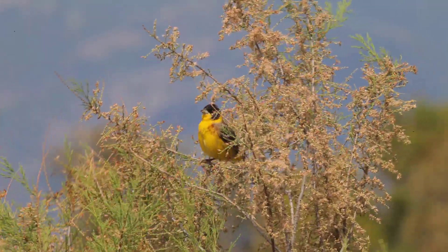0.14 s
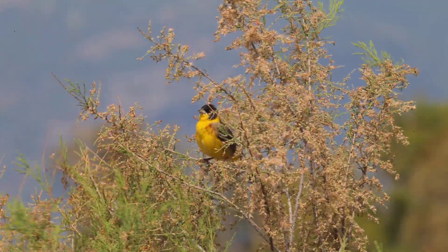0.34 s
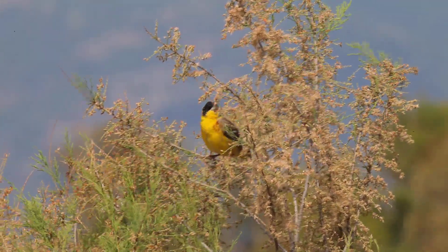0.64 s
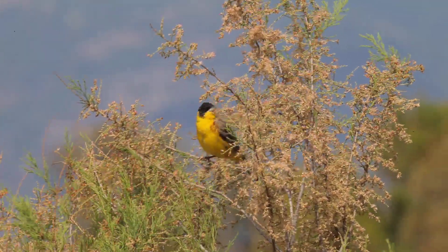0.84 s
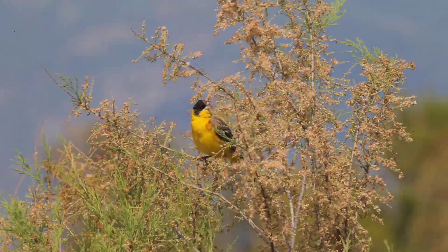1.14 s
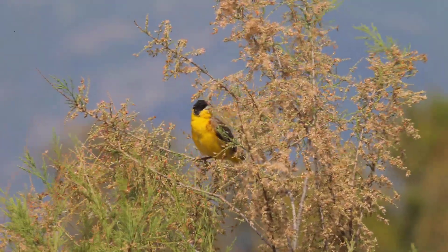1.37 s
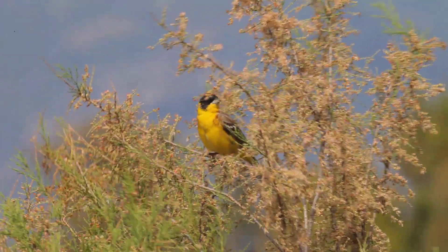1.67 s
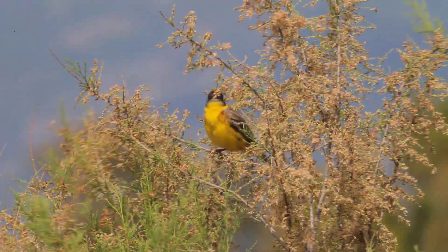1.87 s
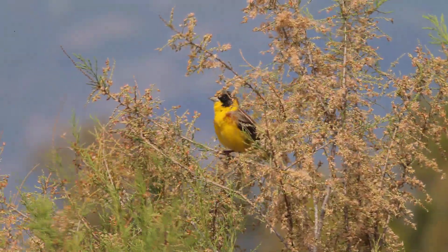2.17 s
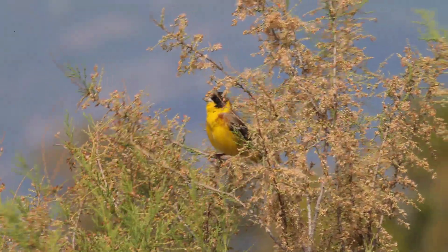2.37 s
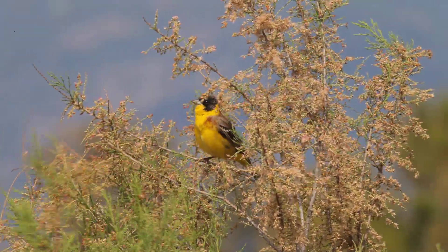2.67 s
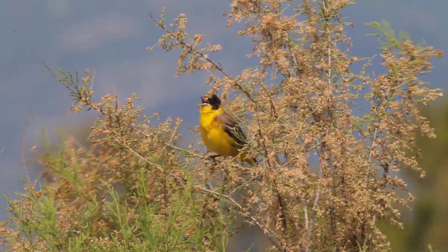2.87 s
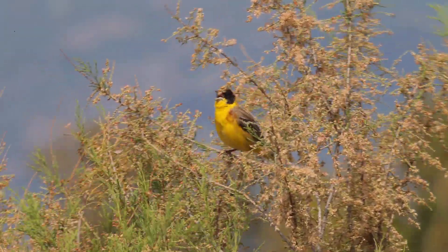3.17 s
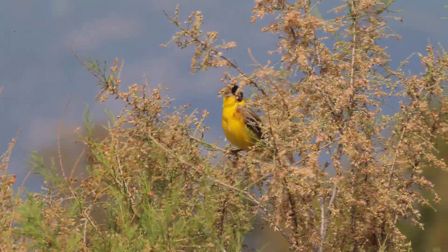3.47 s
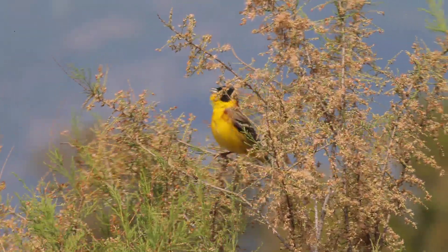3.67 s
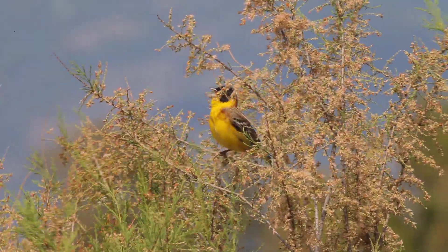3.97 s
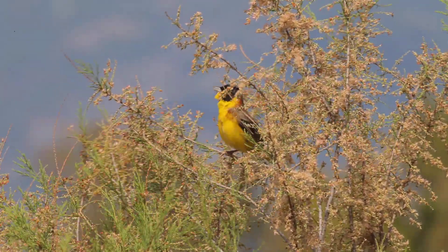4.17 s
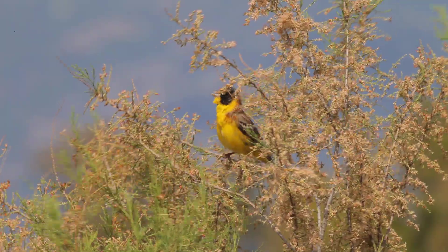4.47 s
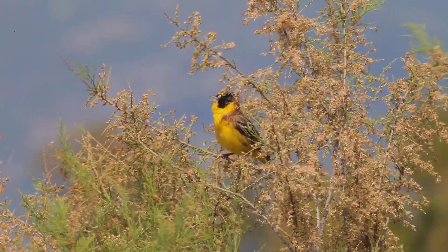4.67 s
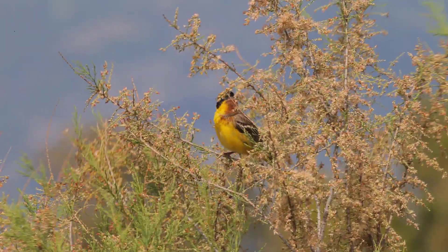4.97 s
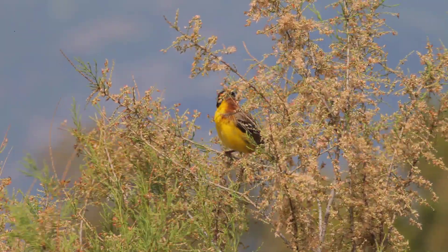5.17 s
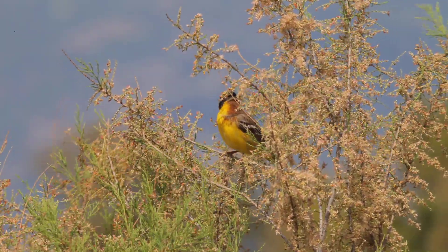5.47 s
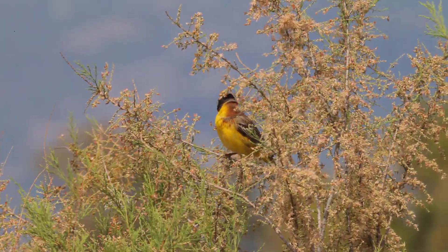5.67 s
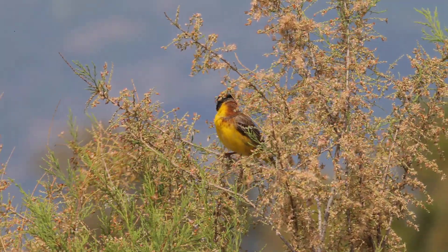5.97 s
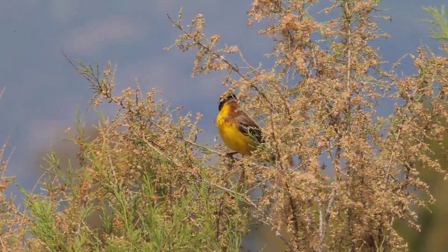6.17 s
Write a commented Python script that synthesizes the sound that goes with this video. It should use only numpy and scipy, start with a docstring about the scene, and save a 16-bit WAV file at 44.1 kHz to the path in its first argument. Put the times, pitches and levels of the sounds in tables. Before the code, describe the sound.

A small songbird gives three buzzy chips, two swelling buzzes and a quick run of high trills, over a light breeze and faint distant birds.

```python
"""In open country a bunting sings from a bush: three buzzy chips, two buzzes that end in a whistle,
then a quick run of trills. Membranes in its syrinx vibrate in the airflow, and the throat filters
the tone; ground and bushes reflect it. Other birds call far off, and foliage hisses in the breeze
over a low rumble. Close by are a dry rasp and the clicks, bumps and rustles of a handheld camera."""
import sys
import numpy as np
from scipy import signal
from scipy.fft import rfft, irfft
from scipy.io import wavfile
from scipy.ndimage import map_coordinates

SR = 44100
rng = np.random.default_rng(int(sys.argv[2]) if len(sys.argv) > 2 else 0)


def wrap_up_sound(samples):
    """Save the sound to the file named by the first command line argument, as 16-bit audio."""
    columns = np.atleast_2d(samples).T
    # keep every value between -1 and 1, then stretch to whole-number steps
    tamed = np.clip(columns, -1, 1)
    steps = np.round(tamed * 32767).astype(np.int16)
    wavfile.write(sys.argv[1], SR, steps)


N = 279153
TIME = np.arange(N) / SR


def bunting():
    """Superposition: the notes of one bird add up to its song."""
    out = arch()
    for table, voice in ((CHIPS, chip), (BUZZES, buzz), (FIGURES, figure),
                         (HELD_NOTES, held), (SLURS, slurred)):
        for s, *note in table:
            add(out, s, voice(*note))
    for s, *pulse, start_db, middle_db, end_db, hiss_db in TRILLS:
        add(out, s, trill(*pulse, (start_db, middle_db, end_db), hiss_db))
    return out


def syrinx(hz, db, second_db=-39, third_db=-38, jitter=0.0021, shimmer_db=1.7, edge_s=0.00076):
    """Self-sustained oscillation: a slightly unsteady tone with second and third harmonics."""
    t = np.arange(len(hz)) / SR
    hz = hz * (1 + jitter * wander(t, 898))
    phase = 2 * np.pi * np.cumsum(hz) / SR
    tone = np.sin(phase) + undb(second_db) * np.sin(2 * phase) + undb(third_db) * np.sin(3 * phase)
    ends = np.clip(np.minimum(t, t[-1] - t) / edge_s, 0, 1)
    return tone * ends * undb(db + shimmer_db * wander(t, 399))


def overtone_db(hz):
    """Membrane tension: high notes carry stronger harmonics than low ones."""
    return np.interp(hz, [2950, 3400, 4400], [-46, -37, -32])


CHIP_LOW_HZ, CHIP_HIGH_HZ, CHIP_SETTLE_S = 2890, 4170, 0.014
VIBRATO_HZ, SWING_HZ, WIDEST_S, PURE_S = 201.5, 1004, 0.015, 0.078
STROKES_PER_S, STROKE_SPAN_HZ = 96, 846
# Buzzy chips. Each row: start in seconds, length in seconds, level of the high voice in dB.
CHIPS = [(.559, 0.092, -24), (1.928, 0.096, -24.5), (2.513, 0.095, -22)]
def chip(length, db, harsh_s=0.025, harsh_delay_s=.006):
    """Frequency modulation on both sides of the syrinx: a dying vibrato above brief, harsh upstrokes."""
    t = clock(length)
    depth = np.interp(t, [CHIP_SETTLE_S / 2, WIDEST_S, PURE_S], [0, 1, 0])
    vibrato = np.cos(2 * np.pi * VIBRATO_HZ * t + 0.52 * wander(t, 92))
    carrier_hz = np.interp(t, [0, CHIP_SETTLE_S], [CHIP_LOW_HZ, CHIP_HIGH_HZ])
    high_db = db - 2 * depth ** 2  # a wide vibrato costs loudness
    out = syrinx(carrier_hz + SWING_HZ * depth * vibrato, high_db, second_db=-33, jitter=0.018)
    out *= envelope(t, attack_s=0.041, release_s=0.02)
    t = clock(harsh_s)
    sawtooth = (t * STROKES_PER_S) % 1 - .5
    low_hz = CHIP_LOW_HZ + STROKE_SPAN_HZ * sawtooth
    low = syrinx(low_hz, db - 11, second_db=-4, third_db=-17, jitter=0.025)
    breath = hiss(len(t)) * undb(db - 19)
    add(out, harsh_delay_s, (low + breath) * envelope(t, attack_s=0.0045, release_s=0.00374))
    return out


# Swelling buzzes. Each row: start in seconds, pulses per second, reference level in dB.
BUZZES = [(2.8855, 83.4, -13.5), (3.151, 78, -15.5)]
def buzz(rate, db):
    """Pulsed, then sustained oscillation: seven arching pulses swell and break into a whistle."""
    pulses = trill(7, rate, hz=3780, sweep_hz=0, arch_hz=1254, open_share=.8,
                   levels_db=(db - 24.5, db - 5, db - 5), hiss_db=-19.5)
    whistle = held(length=0.038, hz=3500, scoop_hz=-600, db=-15, attack_share=0.21)
    return np.concatenate([pulses, whistle])


# Pulse trains. Each row: start in seconds, pulse count, pulses per second, pitch in Hz, sweep and arch
# of a pulse in Hz, open share of the cycle, start, middle and end levels in dB, relative hiss in dB.
TRILLS = [ (3.3751, 7, 74.5, 2903, -140, -20, 0.84, -25.5, -16.5, -23.5, -60),
          (3.585, 6, 70.5, 3330, -400, -130, 0.86, -27, -18, -17.5, -36.5),
          (4.0432, 10, 161, 4550, -1350, 3, 0.68, -26.5, -23, -15.5, -25),
          (4.338, 5, 270, 2714, 612, 5.5, .9, -38, -32, -28, -37.5),
          (4.3749, 6, 36.4, 2940, -1, -450, .42, -23, -20, -28, -38),
          (4.3856, 5, 36.2, 3044, -81.5, -65, 0.36, -19.5, -22, -19, -41),
          (4.6185, 6, 86, 5120, 0, 350, 0.81, -45, -26.5, -20, -30),
          (4.699, 4, 265, 3210, 700, 0, .95, -37, -31, -27, -35), ]
def trill(pulses, rate, hz, sweep_hz, arch_hz, open_share, levels_db, hiss_db,
          edge=0.348, leak_db=-23, stray_hz=42, throat_half_width_hz=730):
    """Source and filter: the syrinx opens once a cycle, sweeping through the throat's resonance."""
    t = clock(pulses / rate)
    cycle = (t * rate + .025 * wander(t, rate)) % 1
    place = np.minimum(2 * cycle / open_share - 1, 1)  # -1 to 1 across a pulse
    offset_hz = sweep_hz * place / 2 + arch_hz * np.cos(np.pi * place)
    opening = np.clip((1 - np.abs(place)) / edge, 0, 1) + undb(leak_db)
    throat_gain = 1 / (1 + (offset_hz / throat_half_width_hz) ** 2)  # tuned to the central pitch
    effort_db = bend(t, *levels_db) + .5 * wander(t, 162.2)
    hz = hz + stray_hz * wander(t, rate)
    jitter = 0.02 * np.std(offset_hz) / throat_half_width_hz  # wide sweeps are rougher
    tone = syrinx(hz + offset_hz, effort_db, overtone_db(hz), overtone_db(hz), jitter)
    return tone * opening * throat_gain + hiss(len(t)) * undb(effort_db + hiss_db)


# A figure sung twice. Each row: start in seconds, reference level in dB.
FIGURES = [(3.7345, -19), (3.8725, -18.5)]
def figure(db, tut_spacing_s=0.035, swoop_at_s=.0675, swoop_s=.012):
    """Periodic repetition: after two low tuts, a downward swoop recurs as a fast, fading trill."""
    out = np.zeros(N)
    for s in (0, tut_spacing_s):
        tut = held(0.029, hz=2252, scoop_hz=400, db=db - 10.5, attack_share=0.047, release_share=0.21)
        add(out, s, tut)
    swoop = slurred(swoop_s, start_hz=4200, middle_hz=3640, end_hz=3080, start_db=db - 4, end_db=db)
    add(out, swoop_at_s, swoop)
    run = trill(6, rate=162, hz=3570, sweep_hz=-1000, arch_hz=0, open_share=.9,
                levels_db=(db, db - .8, db - 7), hiss_db=-42)
    add(out, swoop_at_s + swoop_s, run)
    return out


# Held notes. Each row: start and length in seconds, pitch and its initial offset in Hz, level in dB.
HELD_NOTES = [(3.364, 0.035, 2900, 1, -41), (3.554, 0.0207, 4211, 0, -34), (3.568, 0.017, 4254, -100, -22),
              (4.107, 0.016, 4220, -550, -16.5), (4.233, 0.019, 1796, 403, -35),
              (4.292, 0.012, 1785, 357, -35)]
def held(length, hz, scoop_hz, db, attack_share=0.13, release_share=0.1, scoop_s=0.0029, sag_db=7):
    """Exponential relaxation: a note settles onto its pitch while its level sags."""
    t = clock(length)
    pitch_hz = hz + scoop_hz * np.exp(-t / scoop_s)
    tone = syrinx(pitch_hz, db - sag_db * t / length, overtone_db(hz), overtone_db(hz))
    return tone * envelope(t, attack_share * length, release_share * length)


# Slurred notes. Each row: start and length in seconds, start, middle and end pitches in Hz,
# start and end levels in dB.
SLURS = [ (3.578, 0.0059, 4240, 3850, 2500, -19.5, -13.5), (4.3555, .018, 2770, 3040, 3200, -16, -24),
         (4.524, 0.028, 2860, 2380, 2060, -18.5, -34), (4.714, 0.016, 3310, 3550, 4400, -24, -22.5),
         (4.7315, 0.018, 3790, 3140, 2800, -20, -28), (4.756, .025, 2466, 2990, 3580, -30, -21.5),
         (4.7825, 0.018, 3220, 2640, 2300, -15.5, -41.5), ]
def slurred(length, start_hz, middle_hz, end_hz, start_db, end_db):
    """Quadratic frequency sweep: a note bends through three pitches."""
    t = clock(length)
    hz = bend(t, start_hz, middle_hz, end_hz)
    db = start_db + (end_db - start_db) * t / length
    tone = syrinx(hz, db, overtone_db(hz), overtone_db(hz), jitter=0.013)
    return tone * envelope(t, attack_s=0.0028, release_s=0.0045)


# Course of one low whistle. Each row: time in seconds, pitch in Hz, rms level in dB.
ARCH = [(4.135, 2028, -50), (4.159, 2048, -37.5), (4.173, 2156, -34), (4.185, 2620, -24.5),
        (4.193, 2768, -21), (4.213, 2693, -27), (4.23, 2439, -29.5)]
def arch():
    """Joint frequency and amplitude modulation: a tone swells as it climbs, then sinks again."""
    s = ARCH[0][0]
    hz, db = follow(ARCH, s + clock(ARCH[-1][0] - s))
    out = np.zeros(N)
    add(out, s, np.sqrt(2) * syrinx(hz, db, overtone_db(hz), overtone_db(hz), edge_s=.003))
    return out


# Resonances of the beak. Each row: centre in Hz, width of each filter stage in Hz, relative gain in dB.
BEAK_MODES = [(4543, 1540, 2), (7900, 420, -11), (11200, 1900, -20)]
def hiss(size):
    """Turbulence: rushing air, coloured by the open beak, at rms 1."""
    noise = rng.standard_normal(size)
    return unit(sum(undb(db) * band(band(noise, hz, width), hz, width) for hz, width, db in BEAK_MODES))


# Echoes from ground and bushes. Each row: delay in seconds, gain in dB.
ECHOES = [(.0043, -15), (0.0106, -14), (0.0204, -19.5)]
def countryside(x, low_hz=2400, echo_top_hz=5200):
    """Reflection and scattering: short echoes, reverberation from the bush and a faint long tail."""
    out = x + undb(-22) * scatter(x, t60=0.36) + undb(-33) * scatter(x, t60=1.0)
    # low notes leave the beak in all directions, so more of them comes back
    lows = lowpass(lowpass(x, low_hz), low_hz)
    out += undb(-9) * scatter(lows, t60=0.11)
    for delay, db in ECHOES:
        add(out, delay, undb(db) * lowpass(x, echo_top_hz))
    return out


# A second bird's squeaks. Each row: start and length in seconds, start and end pitches in Hz of the
# lower voice, the same of the upper voice, level of the lower voice in dB.
SQUEAKS = [(0.307, 0.03, 4450, 4780, 6500, 5400, -38.5), (1.341, 0.022, 4140, 5250, 5360, 6570, -31.5)]
# A far bird's repeated wavy whistle. Each row: start in seconds, base level in dB.
FAR_CALLS = [(1.049, -55.5), (3.793, -57), (4.793, -58), (5.745, -57.5), (6.302, -61.5)]
# Course of that whistle. Each row: elapsed time in seconds, pitch in Hz, level above the base in dB.
CALL_COURSE = [(0, 1535, -4), (.025, 1858, 9.5), (.045, 1690, 3), (.07, 1510, -1.5), (.11, 1640, 2),
               (.16, 1717, 13.5), (.19, 1560, -13)]
# Far glides. Each row: start and length in seconds, start and end pitches in Hz, level in dB.
FAR_GLIDES = [(0.447, .024, 4150, 4200, -52), (1.392, 0.11, 3210, 3300, -57),
              (1.585, 0.0415, 4390, 4200, -57), (1.775, 0.0575, 737.3, 890, -54.5),
              (2.102, 0.066, 4400, 4520, -56), (4.945, 0.1, 3980, 4500, -52.5),
              (5.039, 0.043, 4760, 5200, -53), (5.219, .035, 4490, 4250, -50),
              (5.255, 0.041, 4400, 5700, -58)]
def neighbours():
    """Biphonation: a bird squeaks with both sides of its syrinx; farther birds whistle single tones."""
    out = np.zeros(N)
    for s, length, low_start_hz, low_end_hz, high_start_hz, high_end_hz, db in SQUEAKS:
        add(out, s, glide(length, low_start_hz, low_end_hz, db, second_db=-10.5))
        add(out, s, glide(length, high_start_hz, high_end_hz, db - 1.5, second_db=-20.5))
    hz, course_db = follow(CALL_COURSE, clock(CALL_COURSE[-1][0]))
    for s, base_db in FAR_CALLS:
        add(out, s, syrinx(hz, base_db + course_db, second_db=-40))
    for s, length, start_hz, end_hz, db in FAR_GLIDES:
        add(out, s, glide(length, start_hz, end_hz, db, second_db=-27))
    return out


def glide(length, start_hz, end_hz, db, second_db, taper_db=16):
    """Linear frequency sweep: one whistle that swells and fades."""
    progress = clock(length) / length
    hz = start_hz + (end_hz - start_hz) * progress
    return syrinx(hz, db - taper_db * (2 * progress - 1) ** 2, second_db)


# Bouts of far chatter. Each row: middle of the first chirp in seconds, chirp count, level in dB.
CHATTER = [(3.523, 1, -47), (3.709, 1, -46.5), (4.285, 1, -46.5), (4.584, 1, -45), (4.812, 2, -46),
           (5.04, 2, -47), (5.245, 1, -48), (5.447, 8, -47)]
def chatter(centre_hz=3600, swing_hz=540, spread_hz=200, spacing_s=.126, taper_db=13):
    """Random frequency modulation: harsh chirps at an even pace, blurred by vegetation on the way."""
    out = np.zeros(N)
    for first, chirps, db in CHATTER:
        for k, (stretch, detune) in enumerate(rng.uniform(-1, 1, (chirps, 2))):
            length = .085 * (1 + .3 * stretch)
            t = clock(length)
            hz = centre_hz + spread_hz * (detune + wander(t, 30)) + swing_hz * wander(t, 600)
            chirp = syrinx(hz, db - taper_db * (2 * t / length - 1) ** 2)
            add(out, first + k * spacing_s - length / 2, chirp)
    return scatter(out, t60=.06)


# Dry clicks. Each row: start in seconds, peak in dB, centre in Hz, decay constant in seconds.
CLICKS = [(.152, -22, 2000, 0.0032), (0.236, -33, 4400, 0.0024), (.352, -36, 2520, 0.0026),
          (2.062, -37, 4500, 0.0029), (2.071, -32.5, 4410, 0.0044), (2.336, -29, 4400, 0.0062),
          (2.588, -28.5, 5600, 0.0043), (4.04, -28.5, 3500, 0.015), (5.096, -38.5, 2060, 0.0029),
          (5.545, -38.5, 2180, 0.02), (5.789, -25.5, 2460, 0.0058)]
def clicks():
    """Transient excitation: brief bursts of noise drive a broad resonance."""
    out, t = np.zeros(N), clock(.15)
    for s, db, hz, decay in CLICKS:
        burst = rng.standard_normal(len(t)) * np.exp(-t / decay)
        click = band(band(burst, hz, 1.15 * hz), hz, 1.15 * hz)
        add(out, s, undb(db) * click / np.abs(click).max())
    return out


# Modes of a hollow knock. Each row: frequency in Hz, relative level in dB, seconds to fall by 60 dB.
KNOCK_MODES = [(542, 0.5, 0.021), (742.2, -4.5, 0.095), (830, -9.5, 0.066), (1330, -9, 0.048),
               (1670, 4.5, 0.015), (1870, 6.5, 0.021), (2110, -4.5, 0.047), (2572, 5.5, 0.007),
               (3530, -3, 0.024), (5050, -7, 0.0041)]
def knock(start_s=1.7195, peak_db=-15):
    """Modal decay: damped sinusoids of alternating sign ring together."""
    out, t = np.zeros(N), clock(.15)
    ring = sum((-1) ** k * undb(db - 60 * t / t60) * np.sin(2 * np.pi * hz * t)
               for k, (hz, db, t60) in enumerate(KNOCK_MODES))
    add(out, start_s, undb(peak_db) * ring / np.abs(ring).max())
    return out


# Soft bumps on the microphone. Each row: middle in seconds, level in dB.
BUMPS = [(1.26, -34), (1.289, -37), (1.323, -35.5), (1.856, -36), (2.038, -38), (2.131, -37.5),
         (2.166, -32.5), (2.191, -30.5), (2.456, -29.5), (2.464, -32.5), (2.735, -35), (2.778, -36),
         (2.872, -26.5), (2.99, -39.5), (3.61, -41.5), (3.816, -36), (4.051, -40.5), (4.125, -31),
         (4.16, -41), (5.824, -36)]
def bumps(middle_hz=111.4, middle_db=-34, db_per_octave=16):
    """Contact time sets pitch: each bump lasts about a cycle, and a harder one is shorter and higher."""
    out, t = np.zeros(N), clock(.15)
    for s, db in BUMPS:
        hz = middle_hz * 2 ** ((db - middle_db) / db_per_octave)
        cycles = (t - t.mean()) * hz
        bump = np.cos(2 * np.pi * (cycles + rng.random())) * np.exp(-(cycles / 0.49) ** 2)
        # the body of the camera sways more slowly under each bump
        sway = np.sin(2 * np.pi * (cycles / 2.06 + rng.random())) * np.exp(-(cycles / 3.4) ** 2)
        add(out, s - t.mean(), undb(db) * (bump + undb(-14.5) * sway))
    return out


# Soft rustles. Each row: middle and length in seconds, level in dB, centre in Hz.
RUSTLES = [(0.013, 0.072, -51.5, 300), (0.159, 0.086, -51.5, 860), (0.158, 0.31, -57, 288),
           (0.832, 0.057, -57.5, 340), (0.998, 0.031, -48, 320)]
def rustles(grain_db=7.2):
    """Friction: a hand on the camera makes swells of low, grainy noise."""
    out = np.zeros(N)
    for s, length, db, hz in RUSTLES:
        grains = rng.standard_normal(N) * undb(grain_db * wander(TIME, 150))
        swell = np.exp(-(2 * (TIME - s) / length) ** 2)
        out += unit(band(band(grains, hz, hz), hz, hz)) * undb(db) * swell
    return out


# Envelope of a dry rasp. Each row: time in seconds, level in dB.
RASP_LEVELS = [(5.34, -56), (5.349, -45.5), (5.358, -35), (5.381, -36), (5.39, -38.5), (5.418, -42.5),
               (5.426, -58.5)]
# Its resonances. Each row: centre in Hz, width of the first filter stage in Hz, relative gain in dB.
RASP_MODES = [(1824, 520, 5), (2850, 480, 6.5), (3770, 360, 4), (8300, 500, -15)]
def rasp(grain_db=0.5):
    """Forced resonance: uneven grains ring a few broad modes in one scratchy burst."""
    out = np.zeros(N)
    s = RASP_LEVELS[0][0]
    t = s + clock(RASP_LEVELS[-1][0] - s)
    grains = rng.standard_normal(len(t)) * undb(grain_db * wander(t, 580))
    body = sum(undb(db) * band(band(grains, hz, width), hz, 2 * width) for hz, width, db in RASP_MODES)
    add(out, s, unit(body) * undb(follow(RASP_LEVELS, t)[0]))
    return out


# Spectrum of the open air. Each row: frequency in Hz, relative spectral density in dB.
AIR_SPECTRUM = [(15, -24.5), (25, -3.5), (80, 4.5), (126, -3.5), (179, 5), (324, -7), (2200, -13.5),
                (3050, -10.5), (3390, -9), (6140, -16), (13400, -25), (15800, -25.5)]
def air(db=-55.5):
    """Ambient noise: a nearly steady distant rumble and hiss."""
    return coloured(AIR_SPECTRUM) * undb(db + 0.23 * wander(TIME, 5.8))


# Spectrum of the foliage. Each row: frequency in Hz, relative spectral density in dB.
LEAF_SPECTRUM = [(240, 0), (400, -8), (1210, -8.5), (1650, -2.5), (2690, -8), (3340, -4), (3660, -22),
                 (4410, -7.5), (5140, -11.5), (8280, -9), (15800, -31.5)]
# Course of the breeze. Each row: time in seconds, relative level of the foliage in dB.
BREEZE = [(0, -64), (.15, -52.5), (.45, -53.5), (.6, -51.5), (1.05, -51.5), (1.4, -55.5), (1.65, -55.5),
          (1.85, -61.5), (2.1, -53.5), (2.25, -58.5), (2.6, -50), (2.9, -49), (3.1, -63.5), (4, -62),
          (4.8, -61.5), (6.33, -65.5)]
def foliage(trim_db=-3.5, flutter_db=4.0, grain_db=2.0, sway_db=2, twig_hz=8200):
    """Amplitude-modulated noise: leaves rustle as the breeze comes and goes."""
    leaves = coloured(LEAF_SPECTRUM)
    # the finest twigs swell and fade on their own
    leaves += band(leaves, twig_hz, twig_hz / 2) * (undb(sway_db * wander(TIME, 25)) - 1)
    flicker_db = flutter_db * wander(TIME, 25.02) + grain_db * wander(TIME, 900)
    return leaves * undb(follow(BREEZE, TIME)[0] + trim_db + flicker_db)


def scatter(x, t60):
    """Diffuse reverberation: countless faint reflections die away exponentially."""
    t = clock(t60)
    tail = rng.standard_normal(len(t)) * undb(-60 * t / t60) * np.minimum(t / 0.0021, 1)
    return signal.fftconvolve(x, tail / np.linalg.norm(tail))[:N]


def coloured(points):
    """Spectral shaping: noise of rms 1 with a given spectrum."""
    hz, db = np.transpose(points)
    bins = np.maximum(np.arange(N // 2 + 1) * SR / N, 1)
    gain = undb(np.interp(np.log(bins), np.log(hz), db))
    return unit(irfft(rfft(rng.standard_normal(N)) * gain, N))


def band(x, hz, width):
    """Second-order resonance, gain 1 at its centre."""
    return signal.lfilter(*signal.iirpeak(hz, max(hz / width, .5), fs=SR), x)


def lowpass(x, hz):
    """Fourth-order treble cut."""
    return signal.sosfilt(signal.butter(4, hz, fs=SR, output="sos"), x)


def envelope(t, attack_s, release_s):
    """Amplitude envelope: rounded attack, hold and release."""
    attack = np.sin(np.pi / 2 * np.clip(t / attack_s, 0, 1))
    release = np.sin(np.pi / 2 * np.clip((t[-1] - t) / release_s, 0, 1)) ** 2
    return attack * release


def wander(t, rate):
    """Smooth random fluctuation of spread near 1, changing rate times a second."""
    steps = (t - t[0]) * rate
    return map_coordinates(rng.standard_normal(int(steps[-1]) + 2), [steps], order=3, mode="nearest")


def bend(t, start, middle, end):
    """A parabola through three values."""
    return np.polyval(np.polyfit([0, .5, 1], [start, middle, end], 2), t / t[-1])


def follow(rows, at):
    """Linear interpolation of a table's columns along the first."""
    first, *columns = np.transpose(rows)
    return [np.interp(at, first, c) for c in columns]


def clock(length):
    """Sample times of a short sound."""
    return np.arange(max(int(length * SR), 64)) / SR


def add(out, s, x):
    """Superpose x on out from time s."""
    i = max(int(s * SR), 0)
    out[i:i + len(x)] += x[:max(N - i, 0)]


def unit(x):
    """Scale to rms 1."""
    return x / np.sqrt(np.mean(x ** 2) + 1e-18)


def undb(db):
    """Decibels to gain."""
    return 10 ** (np.asarray(db) / 20)


def scene(overtone_limit_hz=11500):
    """Superposition: birds, small close noises and the open air sum in one channel."""
    song = lowpass(bunting() + neighbours(), overtone_limit_hz)
    birds = countryside(song) + chatter()
    handling = clicks() + knock() + bumps() + rustles()
    return (birds + handling + rasp() + air() + foliage())[None]


def record(dry, top_hz=15900):
    """Band limiting: the camera cuts the top of the treble."""
    return signal.sosfilt(signal.ellip(10, .2, 70, top_hz, fs=SR, output="sos"), dry)


dry = scene()
out = record(dry)
wrap_up_sound(out)
```